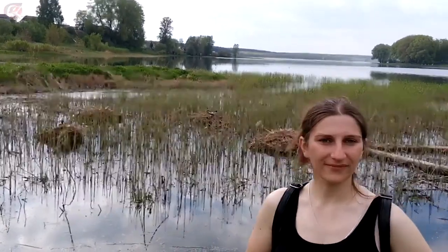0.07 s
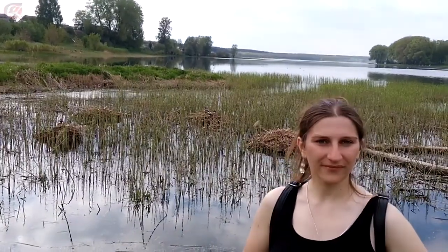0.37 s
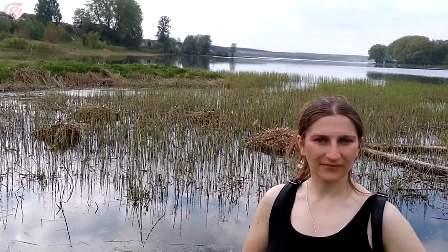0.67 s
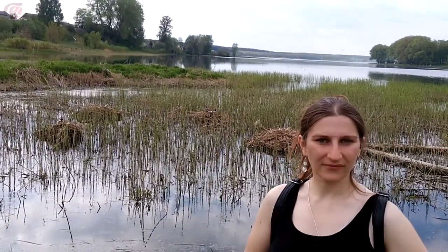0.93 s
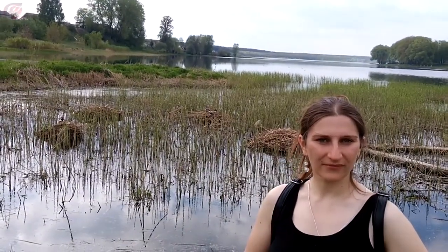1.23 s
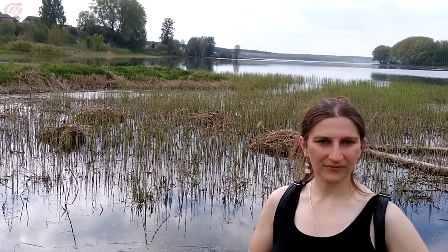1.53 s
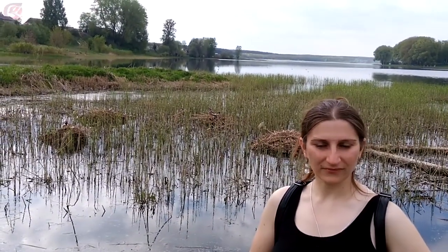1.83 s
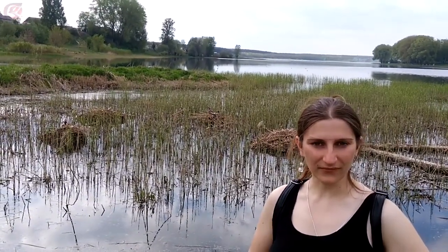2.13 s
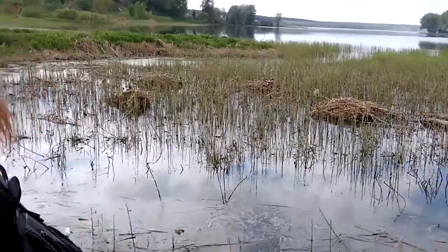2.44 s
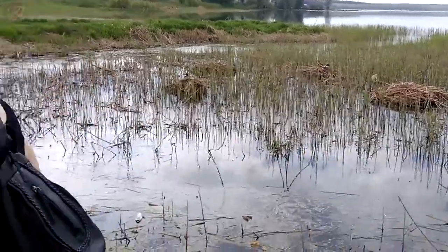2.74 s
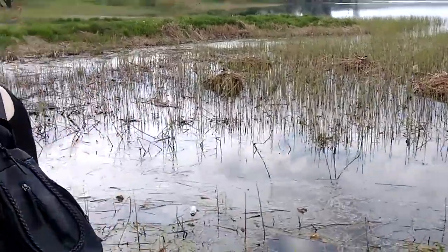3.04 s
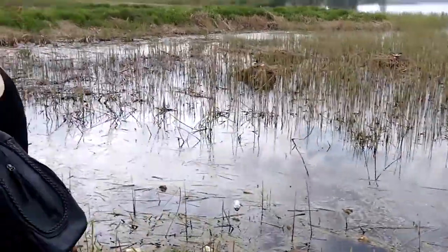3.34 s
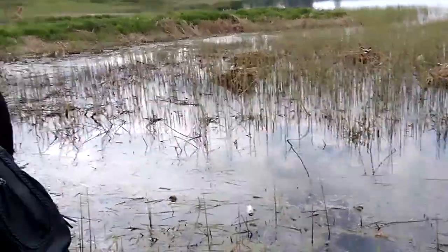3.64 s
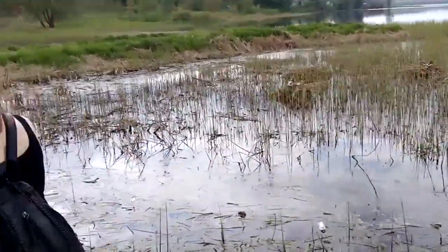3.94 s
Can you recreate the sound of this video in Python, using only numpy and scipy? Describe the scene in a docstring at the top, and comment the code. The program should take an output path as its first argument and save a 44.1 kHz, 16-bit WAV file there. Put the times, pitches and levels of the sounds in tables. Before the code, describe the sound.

Wind and handling noise on a hand-held microphone beside a lake. Short low gusts thump one side or the other as small birds chirp faintly. Then fingers rub, scrape and tap right at the microphone, with a low hum underneath.

```python
"""A reedy lakeshore, heard through the two ports of a hand-held camera.
Over steady air and a low hum, turbulent puffs of wind buffet one port or the other.
A warbler rasps as pulses ring its throat, a second bird whistles, and far calls echo in the reeds.
Then the camera is swung round: stick-slip friction hisses and clicks right at the ports,
and fingers knock the case into resonance."""
import sys
import numpy as np
from scipy import signal
from scipy.fft import rfft, irfft
from scipy.io import wavfile

SR = 44100
rng = np.random.default_rng(int(sys.argv[2]) if len(sys.argv) > 2 else 0)


def bounce(signal):
    """Save signal as a 16-bit WAV file at the path given by the first command-line argument."""
    frames = np.transpose(np.atleast_2d(signal))
    limited = np.clip(frames, -1, 1)
    pcm = np.round(limited * 32767).astype(np.int16)
    wavfile.write(sys.argv[1], SR, pcm)


N = 176400
T = np.arange(N) / SR
FREQS = np.maximum(np.arange(N // 2 + 1) * SR / N, 1)

# The ports' response to a touch. Each row: frequency in Hz, left and right relative gain in dB.
PORT_RESPONSE = [(307, -85, -57), (1600, -21, -17.5), (2460, -18.5, -20), (3140, -12.5, -11.5),
                 (4050, -9.5, -10), (5400, -8, -8.5), (6570, -1, -6), (6850, -9, -5.5), (9530, -14, 1),
                 (12430, -25.5, -5), (15200, -38.5, -14.5)]


def from_db(db):
    """Amplitude grows tenfold with every 20 decibels."""
    return 10 ** (np.asarray(db) / 20)


def rms_one(x):
    """Division by the root mean square gives unit power."""
    return x / np.sqrt(np.mean(x ** 2) + 1e-20)


def noise():
    """White noise, uncorrelated between the two ports."""
    return rng.standard_normal((2, N))


def drift(seconds):
    """Smoothing white noise gives a random wander of unit power."""
    window = np.hanning(max(int(2 * seconds * SR), 4))
    return rms_one(signal.fftconvolve(rng.standard_normal(N), window, "same"))


def swell(s, rise_s, fall_s):
    """An envelope with a rounded rise to 1 at time s, and a fall."""
    return np.exp(-np.abs((T - s) / np.where(T > s, fall_s, rise_s)) ** 1.5)


def colour(x, table):
    """Spectral shaping by one gain column, or one per port; white noise keeps its power."""
    hz, *columns = np.transpose(table)
    gain = from_db([np.interp(np.log(FREQS), np.log(hz), column) for column in columns])
    return irfft(rfft(x) * rms_one(gain), N)


def ring(x, hz, width_hz):
    """A damped two-pole resonator with gain 1 at its peak."""
    r = np.exp(-np.pi * width_hz / SR)
    feedback = [1, -2 * r * np.cos(2 * np.pi * hz / SR), r * r]
    return signal.lfilter(np.array([1, 0, -1]) * (1 - r * r) / 2, feedback, x)


def blend(x, correlation):
    """In-phase and antiphase parts mix to set the correlation between the ports."""
    antiphase = x[1] * np.array([[1], [-1]])
    return np.sqrt((1 + correlation) / 2) * x[0] + np.sqrt((1 - correlation) / 2) * antiphase


def pan(side_db):
    """Port gains for a level difference, left minus right; the nearer port has gain 1."""
    return from_db(np.minimum([[side_db], [-side_db]], 0))


def through_case(x, lag_s=0.00026):
    """Propagation delay: sound borne by the case reaches the left port later."""
    return np.array([np.interp(T - lag_s, T, x[0]), x[1]])


def add(out, s, x):
    """Superpose a short sound at time s."""
    part = out[:, int(s * SR):][:, :x.shape[1]]
    part += x[:, :part.shape[1]]


def air(start_db=-50, fall_db_per_s=0.5):
    """Slowly calming outdoor air is broadband noise, partly correlated between the ports."""
    # Each row: frequency in Hz, relative spectral density in dB.
    spectrum = [(20, -24), (35, -17.5), (55, 6.5), (75, -6.5), (110, -6), (190, -18), (400, -30),
                (750, -32.5), (1500, -39), (3000, -40), (5000, -45.5), (14000, -50)]
    return from_db(start_db - fall_db_per_s * T) * colour(blend(noise(), correlation=0.46), spectrum)


def hum():
    """A harmonic series on a low, slightly sinking fundamental makes a drone."""
    # Each row: time in seconds, fundamental in Hz, level in dB.
    course = [(0, 73.1, -57), (2.1, 72.9, -64), (2.23, 74.15, -40.5), (2.7, 73.46, -44.5),
              (2.95, 70.17, -43), (3.48, 70.8, -49), (4, 68.7, -47.5)]
    # Gains of the first three harmonics in dB, added to that level.
    harmonics_db = [1.5, -16.5, -26]
    s, hz, db = np.transpose(course)
    phase = 2 * np.pi * np.cumsum(np.interp(T, s, hz)) / SR
    tone = sum(from_db(gain_db) * np.sin(k * phase) for k, gain_db in enumerate(harmonics_db, 1))
    return from_db(np.interp(T, s, db)) * tone


def shore(x, decay_s=0.058):
    """Scattering from reeds and trees leaves an exponentially decaying tail behind each call."""
    tail = rng.standard_normal((2, SR)) * np.exp(-T[:SR] / decay_s)
    return signal.fftconvolve(x, rms_one(tail) / np.sqrt(SR), axes=1)[:, :N]


def whistler(notes, waver, side_db, flutter_db=2, hoarseness=0.35):
    """Random frequency and amplitude modulation roughen tones that glide through three pitches."""
    out = np.zeros((2, N))
    unsteady = 1 + waver * drift(0.0029)
    flutter = rms_one(from_db(flutter_db * drift(0.004)) * (1 + hoarseness * drift(0.0012)))
    for s, length, first, middle, last, db in notes:
        at = np.flatnonzero((T > s) & (T < s + length))
        progress = (T[at] - s) / length
        glide = np.polyfit([0, .5, 1], [first, middle, last], 2)
        hz = np.polyval(glide, progress) * unsteady[at]
        envelope = 2 * flutter[at] * np.sin(np.pi * progress)
        out[:, at] += from_db(db) * pan(side_db) * envelope * np.sin(2 * np.pi * np.cumsum(hz) / SR)
    return out


def warbler(pulse_hz=280, rush=0.35, beat_s=0.0181, beat_db=4.5, flutter_db=1, vary_db=1.5):
    """Source and filter: quick beats of uneven pulses and rush noise ring the shifting throat."""
    # Each row: start in seconds, length in seconds, level in dB, roughness from 0 to 1.
    rasps = [(-.02, 0.038, -63, .12), (0.092, 0.031, -61, 0.19), (0.2, 0.03, -59, 0.11),
             (0.965, 0.037, -59.5, 0.3), (1.104, 0.035, -58.5, 0.08), (1.212, 0.046, -61, 0.7),
             (1.306, 0.046, -59, 0.48), (1.392, 0.045, -61, 0.49), (1.469, 0.042, -59, 0.4),
             (1.902, 0.046, -56, 0.81), (2.021, 0.047, -56.5, 0.93), (2.12, 0.053, -54, 0.89)]
    # Each row: resonance in Hz, width in Hz, relative level in dB in a clear and in a rough note.
    throat = [(1774, 145, 2.5, -11.5), (2815, 200, 16.5, -0.5), (3230, 390, -5, 7), (4420, 640, 6, -11.5),
              (4540, 600, -22, -2)]
    out = np.zeros(N)
    flutter = from_db(flutter_db * drift(0.0043))
    wanders = [1 + 0.011 * drift(0.018) for _ in throat]
    for s, length, db, rough in rasps:
        at = np.flatnonzero((T > s) & (T < s + length + .02))  # time for the throat to ring out
        t = T[at] - s
        cycle = np.cumsum(pulse_hz * (1 + 3 * rough * rng.standard_normal(len(t)))) / SR
        pulses = rms_one(np.diff(np.floor(cycle), prepend=0))
        beats = from_db(-beat_db * np.cos(2 * np.pi * t / beat_s))
        arch = np.sqrt(np.maximum(np.sin(np.pi * np.minimum(t / length, 1)), 0))
        source = (pulses + rush * rough * rng.standard_normal(len(t))) * flutter[at] * beats * arch
        note = 0
        for (hz, width_hz, clear_db, rough_db), wander in zip(throat, wanders):
            # A moving resonance: shift down to 0 Hz, low-pass, shift back.
            carrier = np.exp(2j * np.pi * np.cumsum(hz * wander[at]) / SR)
            lowpass = signal.butter(2, width_hz / 2, fs=SR, output="sos")
            band = np.real(carrier * signal.sosfilt(lowpass, source / carrier))
            band_db = clear_db + rough * (rough_db - clear_db) + vary_db * rng.standard_normal()
            note = note + rms_one(band) * from_db(band_db)
        out[at] += from_db(db) * rms_one(note)
    return out


def birds():
    """Direct and scattered sound add; far calls carry a greater share of echo than near whistles."""
    # Slurred whistles. Each row: start and length in seconds, first, middle and last pitch in Hz,
    # relative level in dB.
    whistles = [(.345, 0.055, 4560, 4250, 4000, -61.5), (0.484, 0.067, 4500, 4270, 3650, -52.5),
                (0.636, 0.083, 3200, 4250, 4165, -55.5), (0.68, 0.064, 4500, 5370, 6120, -56),
                (0.889, .06, 3880, 4250, 4100, -60.5), (1.03, 0.045, 3230, 4000, 3700, -58),
                (1.136, 0.048, 3370, 3964, 3830, -58.5), (1.348, 0.041, 3790, 3920, 3840, -57.5),
                (1.452, 0.0545, 3380, 3830, 3870, -57), (1.773, .05, 4050, 4206, 4200, -59),
                (2.013, 0.046, 3660, 4240, 4370, -52), (2.928, 0.076, 3180, 3540, 3758, -50),
                (3.597, 0.12, 3250, 4500, 4420, -45.5)]
    # Thin whistles and one low hoot from far across the reeds, with the same columns.
    far_calls = [(.26, 0.22, 2880, 3085, 3226, -65.5), (.79, 0.19, 2080, 2376, 2410, -68.5),
                 (.88, 0.116, 3340, 3500, 3370, -65), (1.535, 0.13, 436, 429, 420, -58)]
    rasps = warbler()
    near = whistler(whistles, waver=0.013, side_db=11)
    far = whistler(far_calls, waver=0.02, side_db=7)
    echo = shore(rasps + from_db(-8) * near + from_db(-3.5) * far)
    return rasps + near + from_db(-2) * far + echo


def wind(slap_share=0.47, fall_ratio=1.77, bass_cut_hz=42):
    """Each puff is a pressure slap inside a short swell of turbulence, mostly at one port."""
    # Each row: peak time in seconds, rise in seconds, level before the bass cut in dB,
    # left minus right in dB.
    puffs = [(0.154, 0.022, -38.5, -24), (0.298, 0.041, -37.5, -19), (.406, 0.0081, -23, 13),
             (0.455, 0.02, -21, 8), (0.596, 0.057, -34.5, -25), (0.703, 0.015, -29.5, -30),
             (0.781, 0.011, -23, -42), (0.99, 0.0091, -30, -35), (1.035, 0.017, -30.5, -26),
             (1.193, 0.021, -35, -25), (1.242, 0.0076, -22.5, -28), (2.846, 0.03, -30.5, -20),
             (3.17, 0.011, -40, 12)]
    # Each row: frequency in Hz, relative level in dB.
    spectrum = [(20, -24), (38, -22), (55, 8.5), (80, 4), (120, -6), (200, -17.5), (300, -34), (2000, -91)]
    out = np.zeros((2, N))
    eddies = colour(noise(), spectrum)
    slap = colour(signal.unit_impulse(N), spectrum)
    for s, rise_s, db, side_db in puffs:
        gust = swell(s, rise_s, rise_s * fall_ratio)
        swirl = gust * eddies / np.sqrt(eddies ** 2 @ gust ** 2)[:, None]  # unit energy
        push = np.roll(slap, int(s * SR), axis=1)
        push = push * np.sign(np.sum(push * swirl, axis=1, keepdims=True))  # same way as the swirl
        puff = np.sqrt(slap_share) * push + np.sqrt(1 - slap_share) * swirl
        puff *= np.linalg.norm(gust) / np.linalg.norm(puff, axis=1, keepdims=True)
        out += from_db(db) * pan(side_db) * puff
    return irfft(rfft(out) / np.sqrt(1 + (bass_cut_hz / FREQS) ** 10), N)


def knocks(decay_s=0.003, ring_db=8.5):
    """An impact excites a resonance of the case, at a pitch set by where the finger lands."""
    # Each row: start in seconds, peak level in dB, resonance in Hz.
    impacts = [(2.508, -33.5, 673), (2.8805, -25, 1110), (2.914, -28, 915), (3.172, -28.5, 1850),
               (3.534, -31, 1030), (3.543, -37, 1700), (3.892, -26.5, 1672), (3.926, -23, 2030),
               (3.946, -32, 800)]
    # Each row: frequency in Hz, relative level in dB.
    spectrum = [(100, 9), (400, -7), (950, 2), (2100, -6.5), (6000, -58)]
    out, t = np.zeros((2, N)), T[:SR // 20]
    crunch = colour(blend(noise(), correlation=0.93), spectrum)
    for k, (s, db, hz) in enumerate(impacts):
        push = crunch[:, k * len(t):(k + 1) * len(t)] * np.exp(-t / decay_s)
        knock = push + from_db(ring_db) * ring(push, hz, width_hz=320)
        add(out, s, from_db(db) * knock / np.abs(knock).max())
    return through_case(out)


def snags(tail_s=0.011, tail_db=-20, tick_db=-0.5):
    """Each snag in the rubbing is a broadband transient with a resonant tick and a short tail."""
    # Each row: start in seconds, relative level in dB, decay in seconds, pitch of the tick in Hz.
    catches = [(.288, -41.5, 0.0017, 6400), (2.336, -11, 0.0012, 4840), (2.502, -11, 0.00098, 8700),
               (2.649, -17.5, 0.00064, 9350), (2.696, -14.5, 0.0009, 10900), (2.881, -26, .0012, 8400),
               (2.903, -28, 0.0019, 6600), (2.9153, -28, 0.0031, 6460), (3.291, -20.5, 0.00048, 8650),
               (3.893, -18.5, .0015, 6500), (3.901, -10, 0.0004, 6490), (3.927, -14.5, 0.0013, 6300),
               (3.936, -7.5, 0.00076, 6340), (3.9451, -9, 0.0015, 10600)]
    out, t = np.zeros((2, N)), T[:SR // 20]
    for s, db, decay_s, hz in catches:
        envelope = np.exp(-t / decay_s) + from_db(tail_db) * np.exp(-t / tail_s)
        crack = np.sign(rng.standard_normal((2, len(t)))) * envelope
        tick = from_db(tick_db) * ring(crack, hz, width_hz=320)
        add(out, s, from_db(db) * (crack + tick))
    return colour(out, PORT_RESPONSE)


def grains(per_s, spread_db, smooth):
    """Shot noise: tiny slips of uneven size fall at random over a smooth hiss."""
    sizes = from_db(spread_db * np.minimum(rng.exponential(1, (2, N)), 5)) * np.sign(noise())
    slips = sizes * (rng.random((2, N)) < per_s / SR)
    return rms_one(rms_one(slips) + smooth * noise())


def moving_contact(x, depth_db=2, wander_s=0.0064):
    """The timbre shifts as the contact moves: each half octave wanders in level on its own."""
    spectrum = rfft(x)
    half_octaves = 2 * np.log2(np.clip(FREQS, 250, 16000) / 250)
    bands = (irfft(spectrum * np.maximum(1 - np.abs(half_octaves - k), 0), N) for k in range(13))
    return sum(band * from_db(depth_db * drift(wander_s)) for band in bands)


def rubbing(grip_s=2.214, grip_hiss_db=-50, grip_scuff_db=-56.5):
    """Stick-slip friction sends a bright hiss through the ports and a dull scuff through the case."""
    # Each row: peak time, rise and fall in seconds, relative levels of hiss and of scuff in dB.
    strokes = [(.04, 0.2, 0.082, -69, -66.5), (.3, 0.013, 0.17, -68.5, -66), (1.15, 0.23, 0.42, -75, -75.5),
               (2.02, 0.16, 0.14, -69.5, -65.5), (2.225, 0.0019, 0.26, -38.5, -49),
               (2.358, 0.057, 0.096, -33, -51), (2.502, 0.058, 0.059, -29.5, -44),
               (2.667, 0.052, 0.036, -29.5, -39.5), (2.72, 0.028, 0.14, -43.5, -53.5),
               (3.095, 0.06, 0.041, -28, -36.5), (3.18, 0.08, 0.16, -33, -42),
               (3.366, 0.026, 0.032, -35, -55), (3.539, 0.0072, 0.038, -41.5, -43),
               (3.589, 0.033, 0.025, -36.5, -42.5), (3.719, 0.098, 0.073, -37.5, -48.5),
               (3.847, 0.088, 0.052, -32, -45), (3.93, 0.033, 0.052, -27, -39)]
    # The case's own ring. Each row: frequency in Hz, left and right relative gain in dB.
    case_response = [(100, 9, -17), (314, 0.5, 3.5), (462, 8.5, 8.5), (1080, 9.5, 9.5), (1500, 12.5, -21),
                     (2170, 18, 18.5), (3250, -37, 0), (8000, -32, -36)]
    sliding = T > grip_s  # from here on the hand keeps sliding lightly
    envelopes = np.array([swell(*stroke[:3]) for stroke in strokes] + [sliding])
    hiss_db, scuff_db = np.transpose([stroke[3:] for stroke in strokes] + [(grip_hiss_db, grip_scuff_db)])
    crackle = from_db(-11.5) * grains(per_s=160, spread_db=0.74, smooth=0)  # fibres snapping free
    fine = grains(per_s=6200, spread_db=3, smooth=0.8)
    coarse = grains(per_s=630, spread_db=5, smooth=0.96)
    hiss = colour(fine + crackle, PORT_RESPONSE)
    scuff = through_case(colour(blend(coarse, correlation=1), case_response))
    # Overlapping strokes add in power.
    hiss_gain = np.sqrt(from_db(hiss_db + 2) ** 2 @ envelopes ** 2)
    scuff_gain = np.sqrt(from_db(scuff_db - 3) ** 2 @ envelopes ** 2)
    stick_slip = from_db(1.1 * drift(0.018))  # the friction catches and lets go
    return moving_contact(stick_slip * (hiss * hiss_gain + scuff * scuff_gain))


def scene():
    """Superposition: the sounds of the shore and of the handling add at each port."""
    return air() + wind() + hum() + rubbing() + snags() + knocks() + birds()


def record(dry, cutoff_hz=14400):
    """Peaks clip at full scale, then a steep low-pass filter removes the highest treble."""
    lowpass = signal.ellip(10, .1, 70, cutoff_hz, fs=SR, output="sos")
    return signal.sosfilt(lowpass, np.clip(dry, -1, 1))


dry = scene()
out = record(dry)
bounce(out)
```